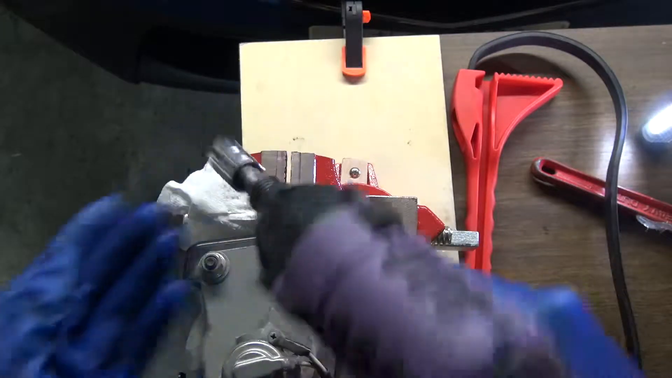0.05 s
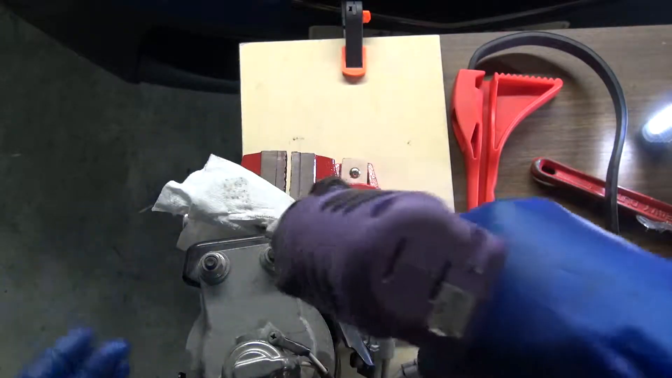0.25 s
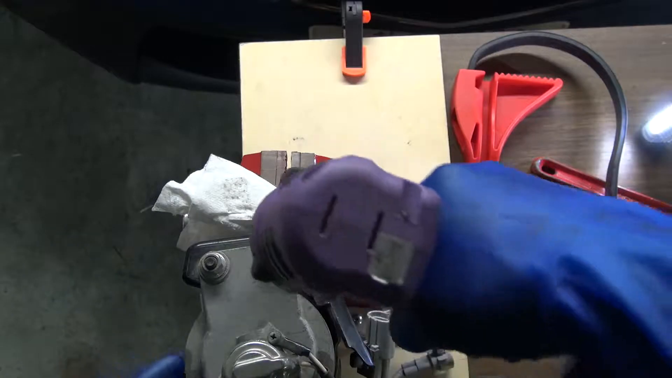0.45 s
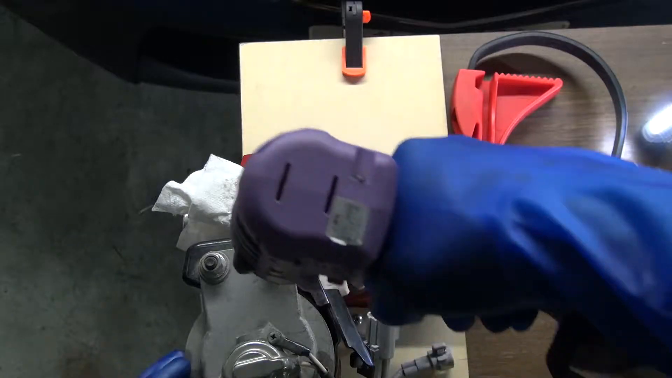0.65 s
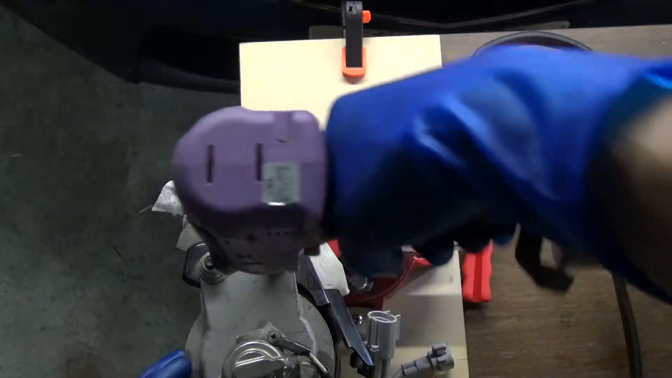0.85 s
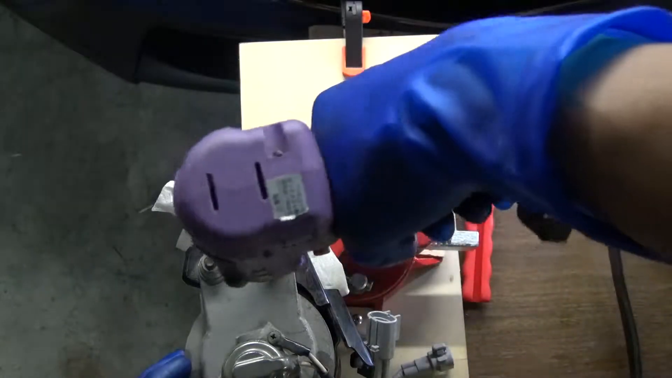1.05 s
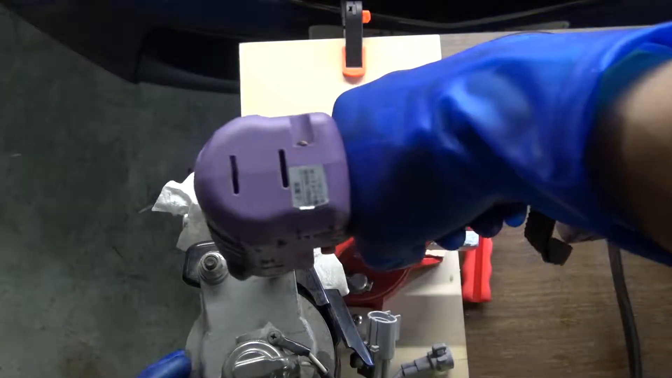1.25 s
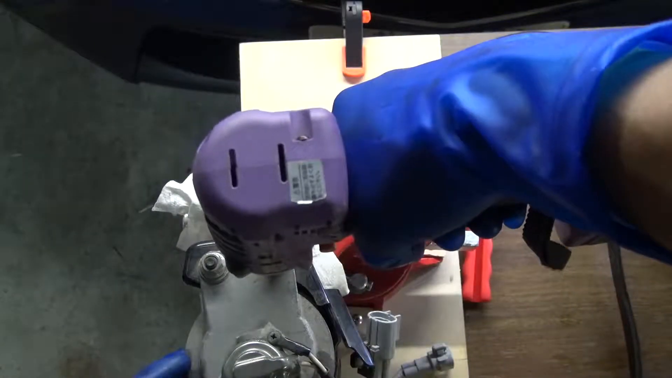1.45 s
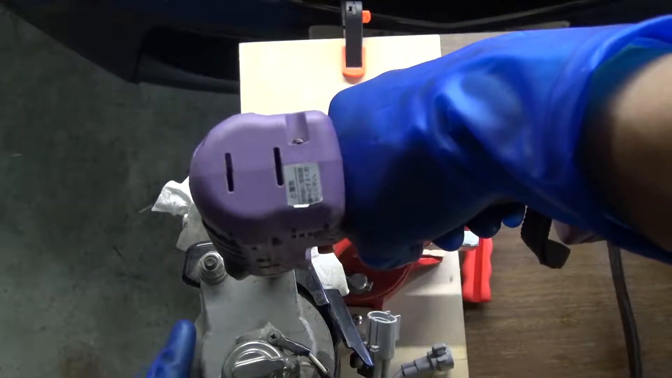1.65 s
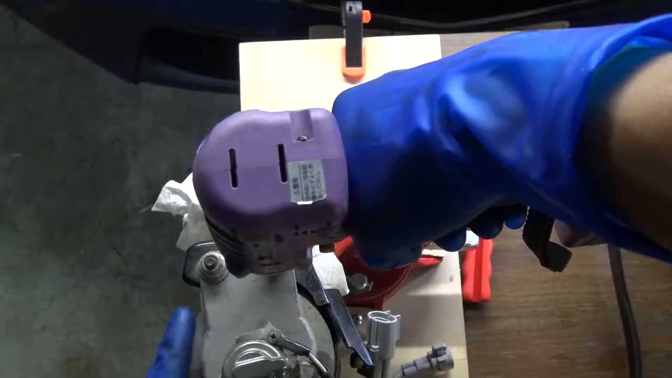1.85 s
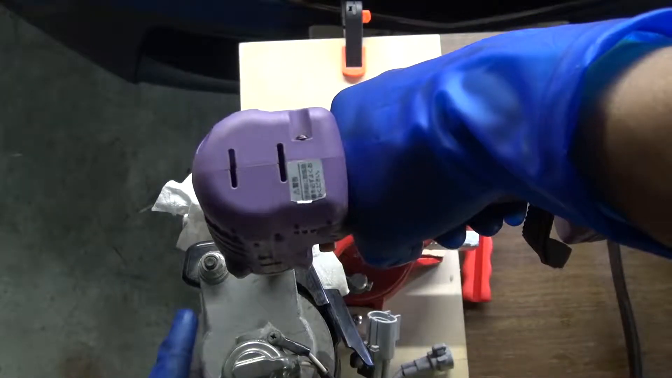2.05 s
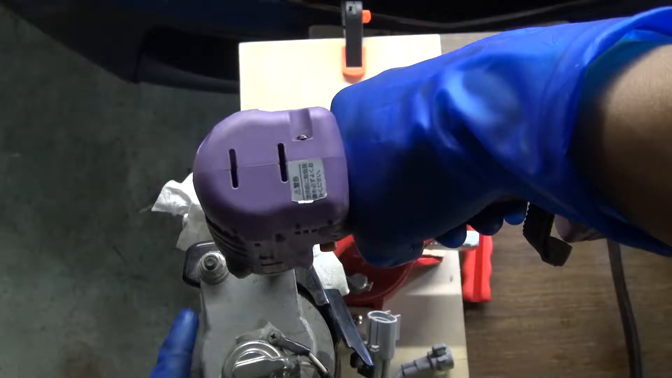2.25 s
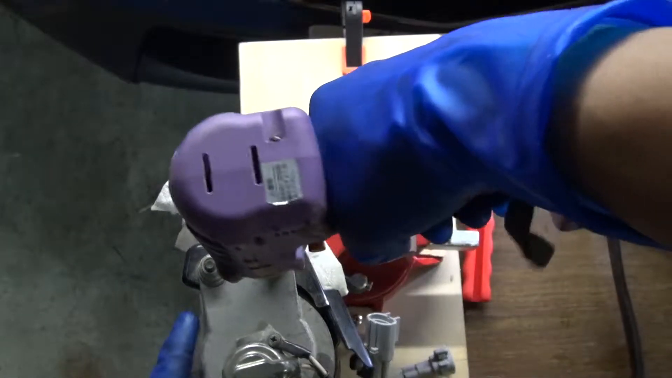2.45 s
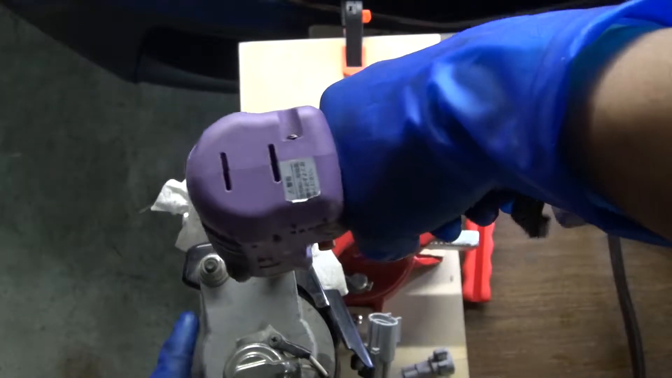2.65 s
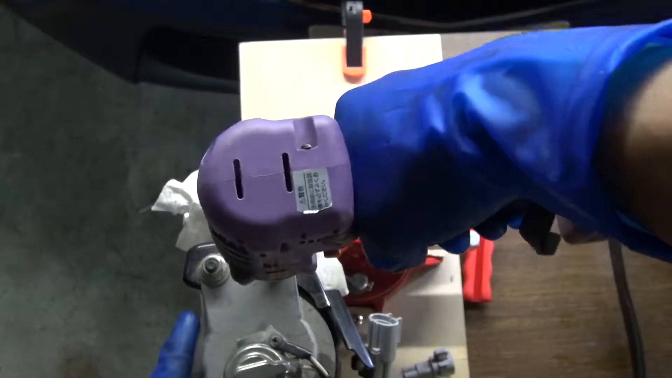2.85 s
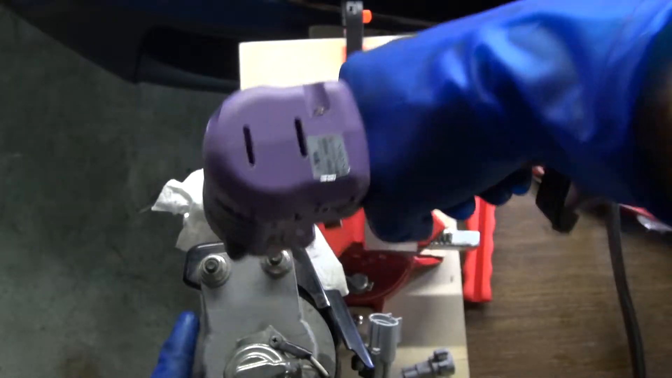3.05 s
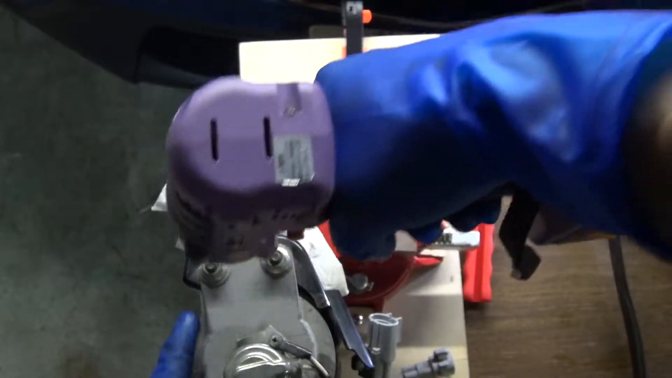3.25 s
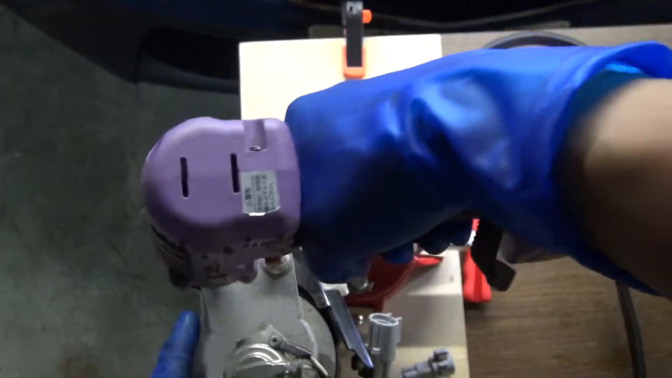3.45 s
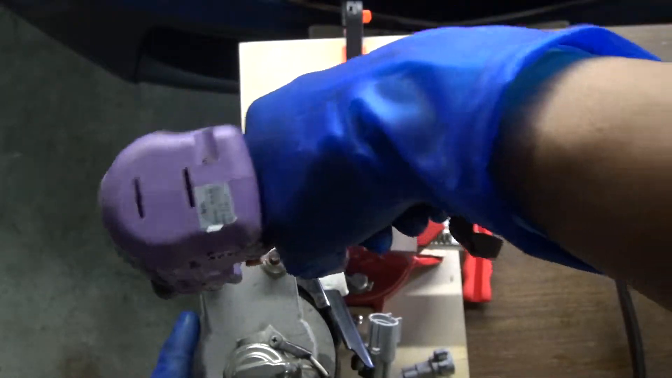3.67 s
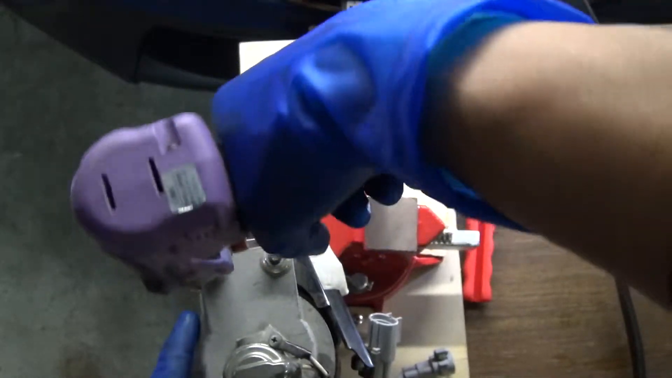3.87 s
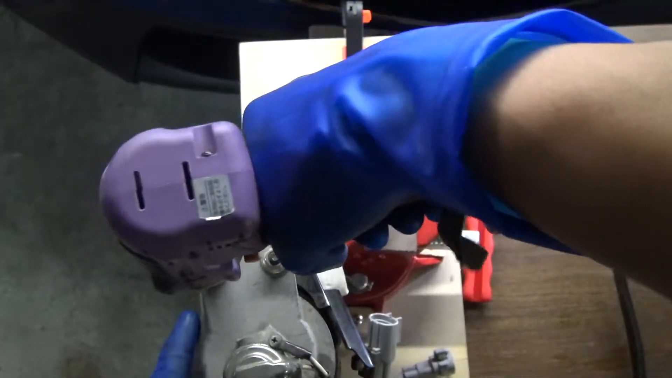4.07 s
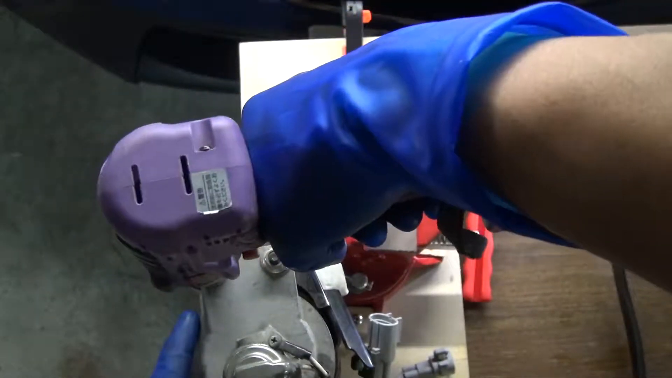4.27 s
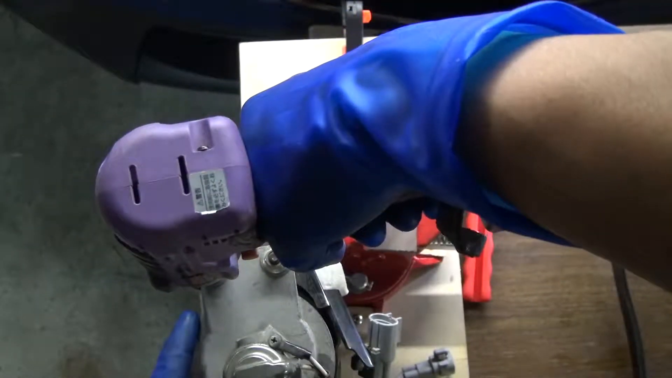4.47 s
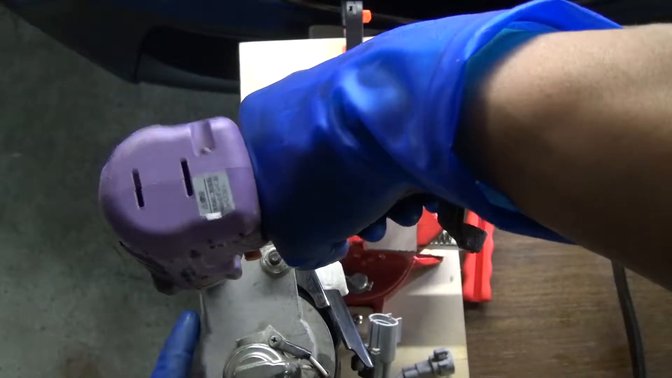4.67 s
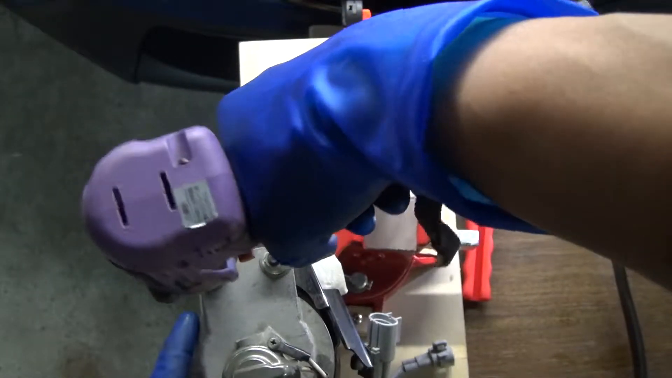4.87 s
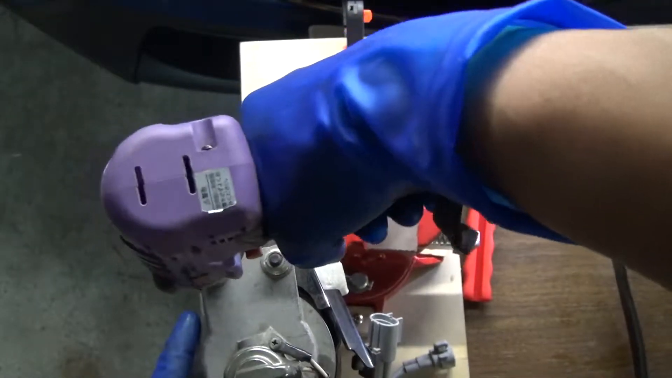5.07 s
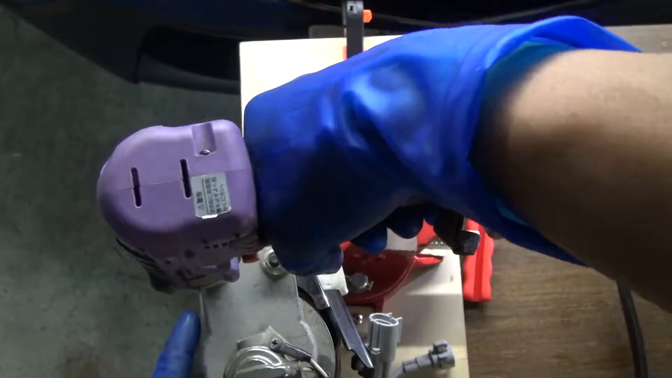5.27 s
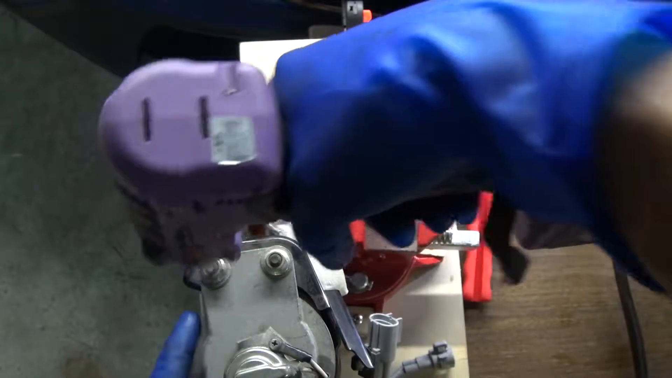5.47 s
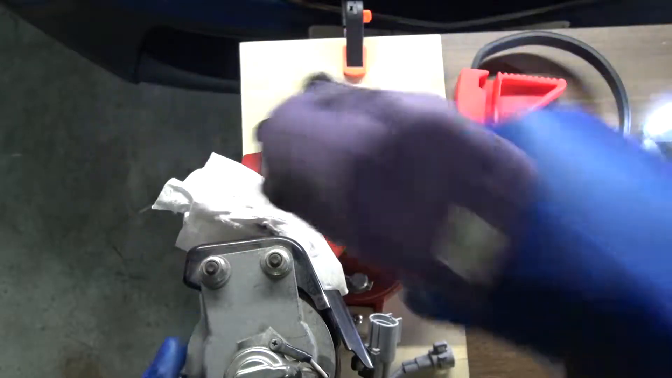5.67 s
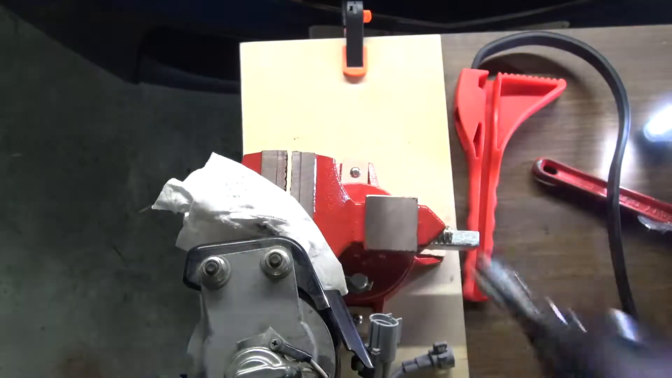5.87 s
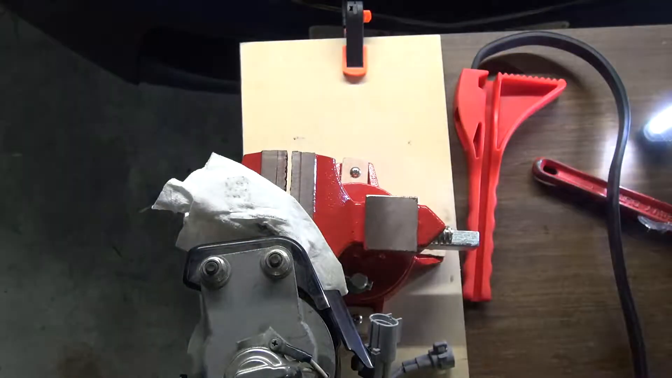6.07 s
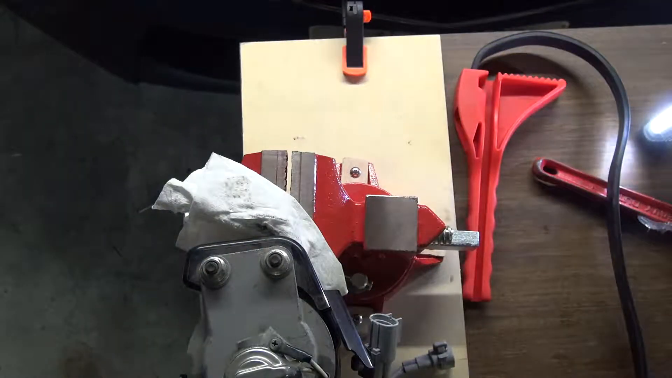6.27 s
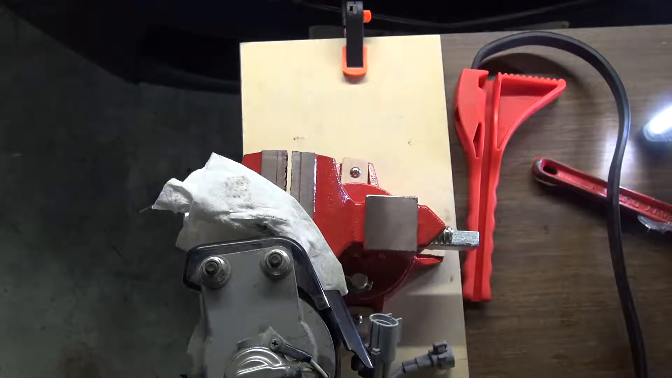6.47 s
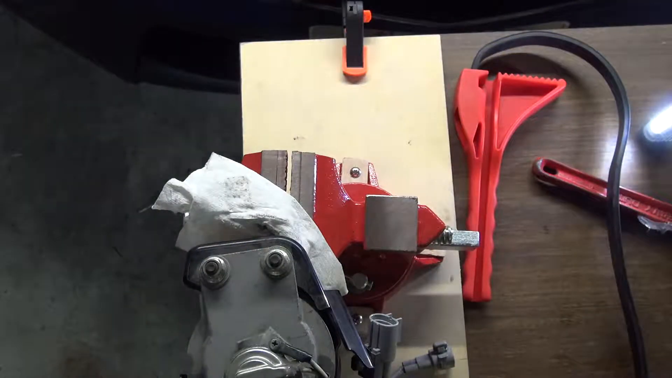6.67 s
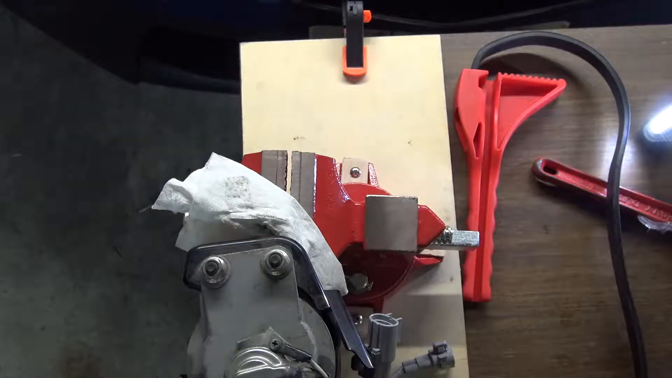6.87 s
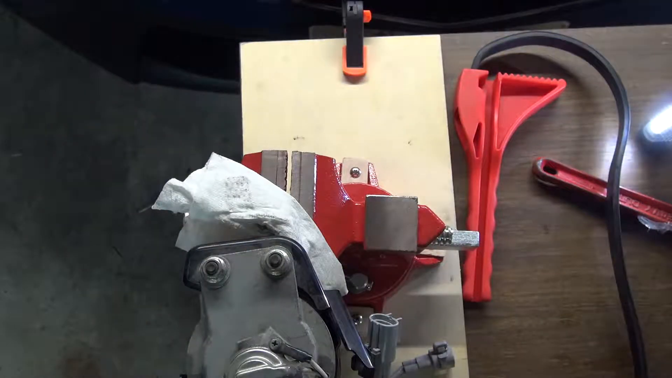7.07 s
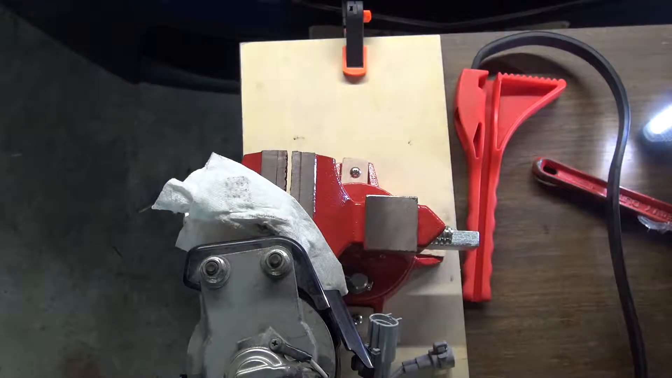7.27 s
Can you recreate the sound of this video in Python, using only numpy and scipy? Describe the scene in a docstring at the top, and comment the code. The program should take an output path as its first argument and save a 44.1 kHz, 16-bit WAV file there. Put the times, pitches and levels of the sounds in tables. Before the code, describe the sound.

Two short, loud rattling bursts from a cordless impact driver, a couple of seconds apart, ring a steel bracket held in a bench vice. A brief falling motor whine comes first. Before and after each burst the socket clinks on the bolt heads and the wooden bench thuds softly. Quiet rubber glove and sleeve rustling ends it, heard over a faint hiss through a small, close microphone in a small workshop.

```python
"""A small workshop: a cordless impact driver works on two bolts of a steel bracket in a bench vice.
The motor coasts down with a sinking whine, the socket clinks on each bolt, and the hammer rattles
in two short, loud bursts that ring the steel and shake the wooden bench. Bumps thud in the bench,
rubber gloves and a sleeve rustle over a faint hiss, and a limiter ducks ahead of the loud blows."""
import sys
import numpy as np
from scipy import signal
from scipy.io import wavfile
from scipy.ndimage import uniform_filter1d

SR = 44100
rng = np.random.default_rng(int(sys.argv[2]) if len(sys.argv) > 2 else 0)


def unload_wav(signal):
    """Save mono or channel-first audio to the path in sys.argv[1] as 16-bit WAV at rate SR, clipped to [-1, 1]."""
    wavfile.write(
        sys.argv[1],
        SR,
        np.round(np.clip(np.atleast_2d(signal).T, -1, 1) * 32767).astype(np.int16),
    )


N = 322812
TIME = np.arange(N) / SR
BAND_EDGES_HZ = np.geomspace(35, 17500, 25)

# hand movement, three stretches of one curve: t/s, level/dB
HAND_MOTION = [
    [(0.45, -58.5), (0.862, -55.5), (1.116, -53.5), (1.32, -57), (2.28, -59.5)],
    [(2.88, -59.5), (3.484, -64), (3.732, -57), (4.128, -60.5), (4.66, -62)],
    [(5.2, -60), (5.73, -55), (6.02, -52.5), (7.32, -55.5)],
]
# rubbing rubber: f/Hz, density/dB
RUB_SPECTRUM = [(45, -28.5), (120, -7), (330, -2.5), (1100, 0), (2300, 0.5), (3700, -7.5), (6000, -10),
                (15000, -41.5)]
# socket and bracket: f/Hz, level/dB, t60/s
STEEL_MODES = [(1015, -9, .17), (1195, -6, .17), (1324, -8, .15), (1730, -6, .14), (1882, -4, .17),
               (2157, 1, .26), (2298, 0, .2), (2442, -1, .19), (2500, -1, .17), (2728, -1, .17),
               (2920, -4, .14), (3433, -2, .18), (3850, -2, .16), (4096, -4, .2), (4425, -3, .17),
               (5986, -1, .14), (6142, -5, .16), (6550, -7, .17), (7520, -4, .2), (8425, -3, .18),
               (8873, -4, .18)]
# dense small modes under the hammer: f/Hz, density/dB
HAMMER_SPECTRUM = [(45, -29.5), (130, -48), (260, -4.5), (400, -2.5), (700, -7), (1300, 0), (2400, 1.5),
                   (3500, -2), (5700, -4), (9300, -4), (11300, -12), (15500, -11.5)]
# one burst per bolt: t/s, blow gap/s, build-up/s, drive/s, first force/dB, full force/dB, bench shake/dB
HAMMER_BURSTS = [(2.3586, .0251, .013, 0.21, -17, 0.5, -10.5),
                 (4.7331, .0222, 0.095, 0.14, -11.5, 1, -11.5)]


def from_db(db):
    return 10 ** (np.asarray(db) / 20)


def unit_rms(x):
    return x / np.sqrt(np.mean(x ** 2) + 1e-20)


def curves(rows):
    """Columns after t/s, interpolated to every sample."""
    t_s, *columns = np.transpose(rows)
    return [np.interp(TIME, t_s, column) for column in columns]


def at_hz(points, hz):
    """Interpolate on a log-frequency axis."""
    points_hz, values = np.transpose(points)
    return np.interp(np.log(hz), np.log(points_hz), values)


def bell_curve(hz, pitch_hz, octaves):
    return np.exp(-(np.log2(hz / pitch_hz) / octaves) ** 2)


def band(x, low_hz, high_hz):
    return signal.sosfilt(signal.butter(2, [low_hz, high_hz], "band", fs=SR, output="sos"), x)


def highpass(x, hz, order):
    return signal.sosfilt(signal.butter(order, hz, "high", fs=SR, output="sos"), x)


def band_noise(low_hz, high_hz):
    return unit_rms(band(rng.standard_normal(N), low_hz, high_hz))


def shaped_noise(spectrum, envelope=lambda hz: 1):
    """Noise with its own envelope in each band."""
    edges = BAND_EDGES_HZ
    centres_hz = np.sqrt(edges[1:] * edges[:-1])
    white = rng.standard_normal((2, N))
    gains = from_db(at_hz(spectrum, centres_hz))
    gains /= np.sqrt(np.sum(gains ** 2 * np.diff(edges)) * 2 / SR)
    return sum(gains[k] * band(white[k % 2] * envelope(hz), edges[k], edges[k + 1])
               for k, hz in enumerate(centres_hz))


def impulses(t_s, sizes):
    return np.bincount(np.round(np.asarray(t_s) * SR).astype(int), sizes, N)[:N] + 1e-18


def ring(x, hz, t60_s):
    """One mode: a unit impulse starts a decaying unit sine."""
    r, w = from_db(-60 / (t60_s * SR)), 2 * np.pi * hz / SR
    return signal.lfilter([0, np.sin(w)], [1, -2 * r * np.cos(w), r * r], x)


def decay(energy, t60_s):
    return signal.lfilter([1], [1, -from_db(-120 / (t60_s * SR))], energy)


def clang(t_s, level_db, spectrum, tilt_db_oct, knee_hz, tick_db, tick_t60_s, body_t60_s, room_db,
          pitch_hz=1000, lift_db=0):
    """Dense modes merge into noise: a tick, a short ring of the parts, then the room."""
    # workshop reverberation: f/Hz, t60/s
    room_decay = [(150, 0.81), (400, 0.43), (1000, .38), (2500, 0.34), (8000, 0.31), (15000, 0.2)]

    def envelope(hz):
        slope_db = tilt_db_oct * np.log2(max(hz, knee_hz) / 2500)
        size = from_db(level_db + slope_db + lift_db * bell_curve(hz, pitch_hz, octaves=0.35))
        energy = impulses(t_s, size ** 2)
        tick = decay(impulses(t_s, (size * from_db(tick_db)) ** 2), tick_t60_s)
        room = from_db(room_db) ** 2 * decay(energy, at_hz(room_decay, hz))
        return np.sqrt(tick + decay(energy, body_t60_s) + room)
    return shaped_noise(spectrum, envelope)


def strike(modes, t_s, level_db, scatter_db, colour_db):
    """Each contact excites each mode with random strength and sign."""
    luck = rng.standard_normal((len(t_s), 2, len(modes)))
    sizes = from_db(level_db[:, None] + scatter_db * luck[:, 0]) * np.sign(luck[:, 1])
    return sum(ring(impulses(t_s, sizes[:, k] * from_db(db + colour_db(hz))), hz, t60_s)
               for k, (hz, db, t60_s) in enumerate(modes))


def motor():
    """Two gear tones sink as the motor coasts; loose teeth tick in the tool's nose."""
    # coasting whine: t/s, f/Hz, level/dB
    coast = [(0, 1179, -42), (.04, 962, -44), (.08, 800, -42.5), (.11, 746, -58), (.2, 604, -91),
             (.3, 500, -130)]
    # gear rattle: t/s, level/dB, centre/Hz
    gears = [(0.0, -32.5, 2640), (0.084, -35.5, 2966), (0.114, -37, 3860), (0.124, -32, 4190),
             (0.162, -35.5, 4130), (0.204, -44, 3210), (0.27, -44, 2940)]
    whine_hz, whine_db = curves(coast)
    phase = 2 * np.pi * np.cumsum(whine_hz * (1 + 0.032 * band_noise(27, 200))) / SR
    whine = from_db(whine_db) * (np.sin(phase) + from_db(-8.5) * np.sin(0.43 * phase))
    rattle_db, centre_hz = curves(gears)
    tooth_cycle = (phase / (2 * np.pi) / 6) % 1
    teeth = rng.standard_normal(N) * (0.45 + np.exp(-8 * tooth_cycle))
    carrier = np.sqrt(2) * np.cos(2 * np.pi * np.cumsum(centre_hz) / SR)
    nose = unit_rms(band(teeth, 17, 520)) * carrier
    rattle = from_db(rattle_db - 7) * (nose + unit_rms(band(teeth, 860, 4800)))
    return whine + rattle * np.interp(TIME, [0.25, 0.33], [1, 0])


def shop_hiss():
    """Two steady, narrow bands of noise."""
    # hiss: f/Hz, width/Hz, rms/dB
    bands = [(4505, 190, -69.5), (5336, 160, -65.5)]
    return sum(from_db(db) * unit_rms(ring(rng.standard_normal(N), hz, np.log(1000) / (np.pi * width_hz)))
               for hz, width_hz, db in bands)


def rustle():
    """Gloves rub and a sleeve swishes as the hands move."""
    # sleeve: f/Hz, density/dB
    swish_spectrum = [(45, -33), (2000, -5.5), (4500, 3), (9700, 2.5), (11000, -6.5), (15500, -5)]
    motion_db, = curves(np.vstack(HAND_MOTION))
    rub = from_db(motion_db + 2) * shaped_noise(RUB_SPECTRUM)
    swish_db = -61.5 + 0.89 * (motion_db + 58)
    return rub + from_db(swish_db) * shaped_noise(swish_spectrum)


def faint_ticking(hz=2960, rate_hz=30, level_db=-70):
    """Quick, regular pulses of narrow noise."""
    gate = np.exp(8 * (np.cos(2 * np.pi * rate_hz * TIME) - 1))
    return from_db(level_db) * unit_rms(gate * band_noise(hz - 200, hz + 200))


def glove_brushes():
    """Rubber brushes past in short, grainy swells."""
    # swells: peak t/s, sigma/s, level/dB, centre/Hz, width/oct
    brushes = [(0.095, 0.14, -50.5, 8900, 0.8), (0.264, 0.059, -53.5, 1100, 0.33),
               (0.996, 0.12, -63, 8500, .8), (1.177, .02, -52, 1600, 1.1), (1.676, 0.067, -51, 6940, 1.7),
               (5.925, 0.081, -55, 10400, 2.2), (6.211, .018, -51, 8000, 1.2),
               (6.25, 0.23, -56.5, 820, 0.42), (6.55, 0.042, -53, 1480, 0.44),
               (6.585, 0.017, -57, 9000, .9), (6.693, 0.049, -52.5, 1120, 0.22),
               (6.713, .015, -53, 9000, .9), (6.832, 0.024, -46, 6660, 6.6)]
    grain = from_db(3.2 * band_noise(30, 400))
    out = np.zeros(N)
    for t_s, sigma_s, level_db, hz, octaves in brushes:
        edge_ratio = 2 ** (octaves / 2)
        noise = band_noise(hz / edge_ratio, min(hz * edge_ratio, BAND_EDGES_HZ[-1]))
        swell = np.exp(-((TIME - t_s) / sigma_s) ** 2 / 2)
        out += from_db(level_db) * unit_rms(noise * grain) * swell
    return out


def socket():
    """The socket knocks on a bolt head, going on and coming off; each spot favours its own modes."""
    # contacts: t/s, level/dB, treble/dB, tick/dB, favoured f/Hz, emphasis of that pitch
    clinks = [(0.087, -23.5, -7.5, 1, 1830, 8), (0.2761, -34.5, -3.5, 15, 1170, 14.5),
              (0.2936, -33.5, -2, 12, 2860, 9), (0.3399, -27.5, -3, 15, 8300, -1.5),
              (0.3603, -25.5, -1, 12.5, 8690, -5), (0.378, -26.5, -3.5, 5, 4420, 9),
              (0.6007, -27, -18, -10, 2260, 10), (0.6482, -12, -8.5, 4, 5720, 13.5),
              (0.679, -22, -20, -4, 2040, 13), (0.7301, -17.5, -7.5, 6, 2670, -11),
              (0.7428, -24, -14, 12, 1190, 12), (0.8178, -25.5, -15.5, 3, 2380, 6.5),
              (1.4615, -45.5, -1.5, 15, 8400, 4), (1.5393, -38.5, -15, 15.5, 2460, 10.5),
              (1.5953, -33, 0.5, 0, 2560, 15), (1.6, -22.5, -9.5, 9.5, 1750, 10.5),
              (2.725, -26, -5.5, 11, 2320, 8), (2.9344, -42, -14, 10, 1790, 8),
              (3.051, -30, -5.5, -12, 8400, -3), (3.0826, -20.5, -7.5, 10, 7770, 17),
              (3.495, -24, -10.5, 3, 3070, 12.5), (3.5594, -21, -11.5, 10, 1060, 11),
              (3.7553, -26.5, -11.5, -12, 1170, 7), (3.7901, -20, -20.5, 18.5, 1830, 4.5),
              (3.7931, -23.5, -16, 11, 850, 7), (5.0667, -27.5, -12.5, 9, 8000, 17),
              (5.3557, -22.5, -8.5, 6.5, 3100, -5), (5.434, -34, -4, 17.5, 2440, 8),
              (6.4743, -37, -21, 0, 2850, 14)]
    # dense small modes: f/Hz, density/dB
    clink_spectrum = [(45, -42), (110, -26.5), (200, -8), (320, -12), (700, -7.5), (1200, -0.5), (2400, 7),
                      (3500, 4.5), (5300, 2.5), (7500, 6.5), (9500, 10.5), (11500, -1.5), (15500, 2.5)]
    t_s, level_db, treble_db, tick_db, pitch_hz, emphasis = np.transpose(clinks)
    tilt_db_oct = 0.5 * treble_db

    def colour_db(hz):
        return tilt_db_oct * np.log2(hz / 2500) + 1.73 * emphasis * bell_curve(hz, pitch_hz, octaves=0.16)
    knock = clang(t_s, level_db - 9.5, clink_spectrum, tilt_db_oct, knee_hz=930, tick_db=tick_db,
                  tick_t60_s=0.014, body_t60_s=0.11, room_db=-5.5,
                  pitch_hz=pitch_hz, lift_db=0.5 * emphasis)
    steel = strike(STEEL_MODES, t_s, level_db - 29.5, scatter_db=2, colour_db=colour_db)
    push_db = level_db + np.interp(treble_db, [-12, 0], [-22, -63.5])   # dull contacts are heavier
    wood = bench_ring(t_s, push_db, low_cut_hz=192, pitch_hz=360, lift_db=11)
    return near_echoes(knock) + steel + wood


def near_echoes(x):
    """The bench top and nearby surfaces comb the sound."""
    # reflections: delay/s, gain
    echoes = [(.0023, 0.028), (.0061, -0.042), (.0097, .2), (0.0156, 0.19)]
    return x + sum(gain * np.interp(TIME - delay_s, TIME, x, left=0) for delay_s, gain in echoes)


def bench_ring(t_s, level_db, low_cut_hz, pitch_hz, lift_db):
    """The board is too small to radiate deep bass; the spot pushed decides which mode leads."""
    # bench and vice: f/Hz, level/dB, t60/s
    bench_modes = [(186, -19, 0.095), (225.8, -9.5, 0.15), (260, -3.5, 0.36), (338.6, -12.5, 0.16),
                   (380.7, -6, 0.37), (419.8, 2.5, 0.2), (443, -12.5, 0.078), (543, -9, 0.2),
                   (640, -10, 0.088), (773, -6.5, 0.22), (850, -9, 0.27)]
    wood = strike(bench_modes, t_s, level_db, scatter_db=1.5,
                  colour_db=lambda hz: lift_db * bell_curve(hz, pitch_hz, octaves=0.2))
    return highpass(wood, low_cut_hz, order=3)


def nudges(count=24):
    """Faint chance touches of the bench, stronger when the hands are busy: t/s, level/dB, f/Hz."""
    when, softness, spot = rng.random((count, 3)).T
    t_s = (np.arange(count) + when) / count * TIME[-1]
    motion_db = np.interp(t_s, *np.vstack(HAND_MOTION).T)
    return np.transpose([t_s, motion_db - 0.5 - 7 * softness, np.interp(spot, [0, 1], [180, 450])])


def bench_bumps():
    """Soft bumps of tool and hand reach only the low modes."""
    # bumps: t/s, level/dB, favoured f/Hz
    bumps = [(0.749, -30, 420), (0.764, -32, 444), (1.202, -43.5, 330), (2.938, -41.5, 390),
             (3.052, -43, 374), (3.579, -29.5, 320), (3.789, -29.5, 267), (3.85, -32.5, 273),
             (5.271, -41.5, 417), (5.414, -47, 426), (5.492, -42, 430), (5.691, -46, 425),
             (5.777, -33, 457), (6.079, -35.5, 477)]
    t_s, level_db, pitch_hz = np.vstack([bumps, nudges()]).T
    thud = clang(t_s, level_db - 10, RUB_SPECTRUM, tilt_db_oct=-4.5, knee_hz=872, tick_db=-1,
                 tick_t60_s=0.012, body_t60_s=0.04, room_db=-8.5)
    wood = bench_ring(t_s, level_db - 8, low_cut_hz=150.2, pitch_hz=pitch_hz, lift_db=8.5)
    return wood + band(thud, 145, 1050)


def run_up():
    """Gears whirr for an instant between the trigger and the first blow."""
    offset_s, level_db = [-0.031, -0.027, 0, 0.03], [-140, -51, -37, -140]
    swell = sum(from_db(np.interp(TIME - start_s, offset_s, level_db)) for start_s, *_ in HAMMER_BURSTS)
    return shaped_noise(HAMMER_SPECTRUM, lambda hz: swell * min(hz / 1200, 1))


def blows(start_s, gap_s, build_s, drive_s, first_db, full_db, full_shake_db, count=12):
    """One burst, each blow with a rebound: t/s, force/dB, brightness, shake/dB, bite/dB."""
    spin_up_s, jitter_s, uneven_db = 0.095, 0.0008, 2.5
    sag_db_per_s, release_db_per_s = -16, -330   # the bolt gives; the trigger is let go
    rebound = np.tile([0, 1], count)
    age_s = gap_s * (np.repeat(np.arange(count), 2) + 0.49 * rebound)
    luck = rng.standard_normal((len(age_s), 3))
    speed = np.minimum(age_s / spin_up_s, 1)
    released_s = np.maximum(age_s - drive_s, 0)
    t_s = start_s + age_s + jitter_s * speed * luck[:, 0]
    # a slow hammer hits as hard on the rebound
    loss_db = -14 * rebound * speed + release_db_per_s * released_s
    force_db = np.interp(age_s, [0, build_s], [first_db, full_db]) + sag_db_per_s * age_s
    force_db += loss_db + uneven_db * luck[:, 1]
    shake_db = np.interp(age_s, [0, 0.045], [-53, full_shake_db])   # the bench starts late
    shake_db += loss_db + uneven_db * luck[:, 2]
    brightness = np.interp(speed, [0, 1], [-1.8, 1.6]) - 260 * released_s
    bite_db = np.interp(speed, [0, 1], [6.5, 1])   # the socket's own pitch rings on a tight bolt
    return np.transpose([t_s, force_db, brightness, shake_db, bite_db])


def hammer():
    """Some 40-45 blows a second ring socket and bracket and shake the bench; the loose socket chatters."""
    t_s, force_db, brightness, shake_db, bite_db = np.vstack([blows(*row) for row in HAMMER_BURSTS]).T
    crash = clang(t_s, force_db - 2, HAMMER_SPECTRUM, 1.5 * brightness, knee_hz=2930, tick_db=-3,
                  tick_t60_s=0.023, body_t60_s=0.091, room_db=-9, pitch_hz=3240, lift_db=bite_db)
    chatter = from_db(0.88 * band_noise(90, 550))
    steel = strike(STEEL_MODES, t_s, force_db - 22, scatter_db=5,
                   colour_db=lambda hz: 0.6 * brightness * np.log2(max(hz, 2500) / 2500))
    wood = bench_ring(t_s, shake_db - 10, low_cut_hz=108.9, pitch_hz=382, lift_db=4.5)
    return near_echoes(crash * chatter) + steel + wood


def scene():
    tool = hammer() + run_up() + motor()
    handling = socket() + bench_bumps() + glove_brushes()
    background = shop_hiss() + rustle() + faint_ticking()
    return (tool + handling + background)[None]


def limiter(x, threshold_db, release_db_per_s, ahead_s):
    """The gain drops just before a loud blow and recovers after it."""
    level_db = 10 * np.log10(np.abs(uniform_filter1d(x ** 2, size=64)) + 1e-12)
    over_db = np.maximum(level_db - threshold_db, 0)
    held_db = np.maximum.accumulate(over_db + release_db_per_s * TIME) - release_db_per_s * TIME
    return x * from_db(-np.interp(TIME + ahead_s, TIME, uniform_filter1d(held_db, size=80)))


def record(dry):
    """Small microphone without deep bass, fast limiter, rounded peaks, steep treble cut."""
    thin = highpass(dry[0], hz=110, order=1)
    limited = limiter(thin, threshold_db=-8, release_db_per_s=265.5, ahead_s=0.0022)
    rounded = highpass(1.044 * np.tanh(limited / 1.247), hz=60, order=1)
    cutoff_hz = 15850
    return signal.sosfilt(signal.ellip(12, 0.1, 80, cutoff_hz, fs=SR, output="sos"), rounded)[None]


dry = scene()
out = record(dry)
unload_wav(out)
```